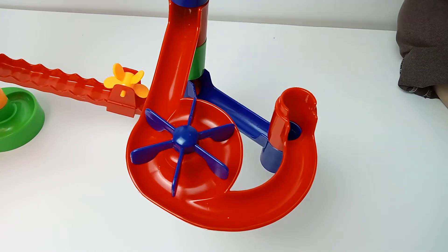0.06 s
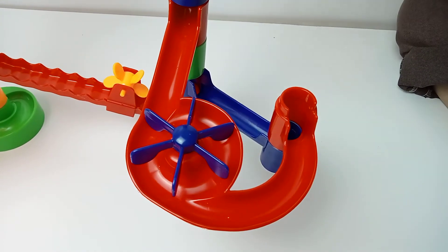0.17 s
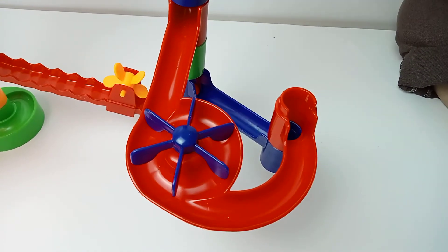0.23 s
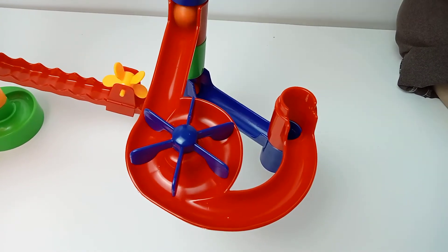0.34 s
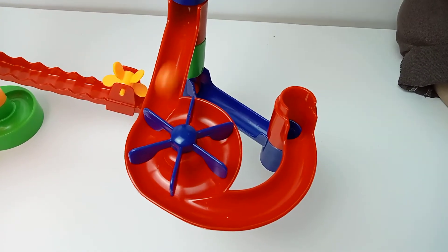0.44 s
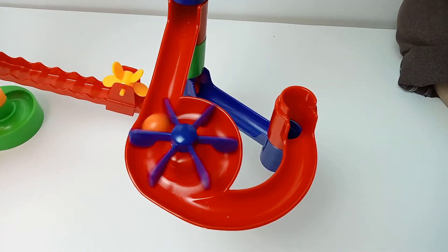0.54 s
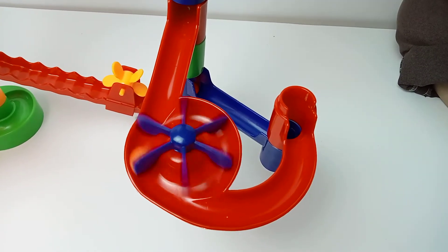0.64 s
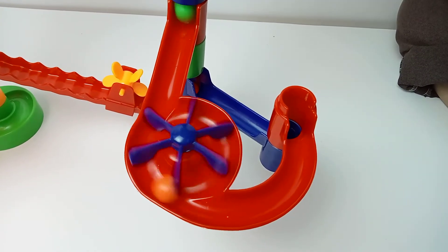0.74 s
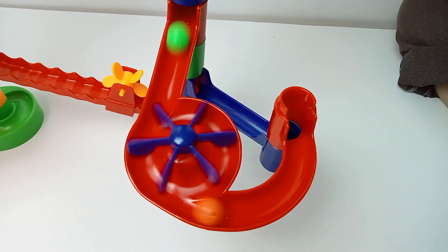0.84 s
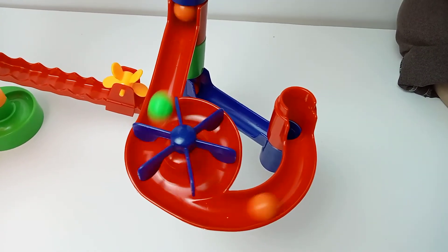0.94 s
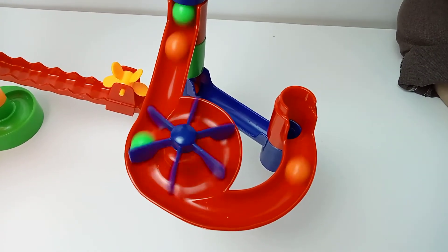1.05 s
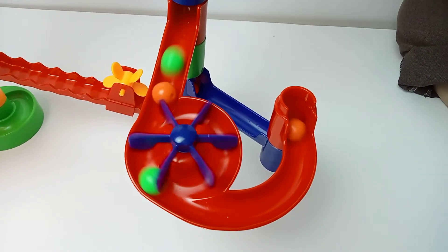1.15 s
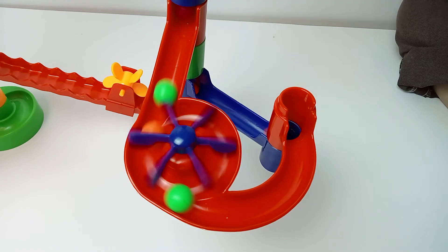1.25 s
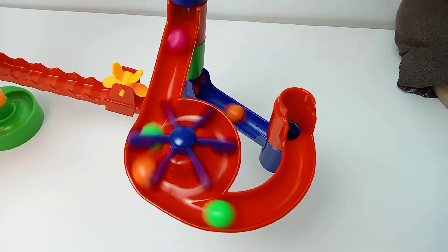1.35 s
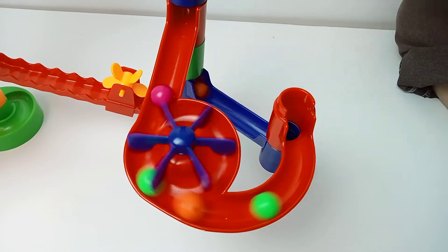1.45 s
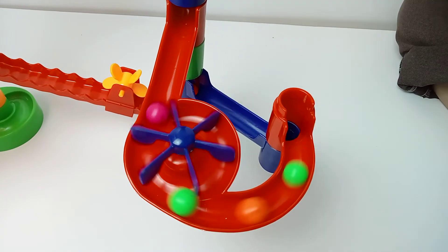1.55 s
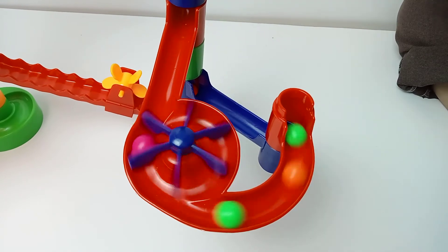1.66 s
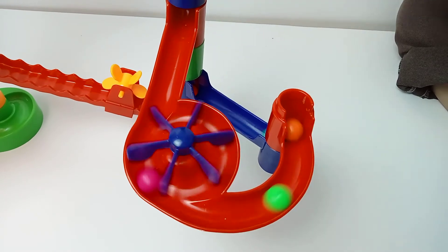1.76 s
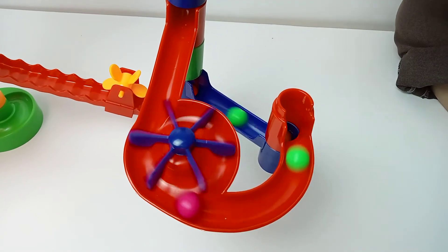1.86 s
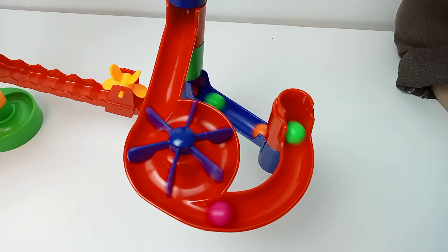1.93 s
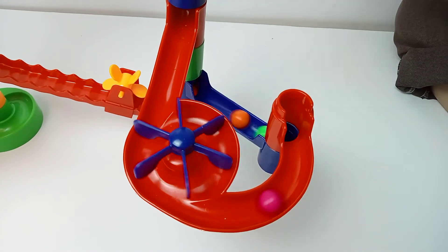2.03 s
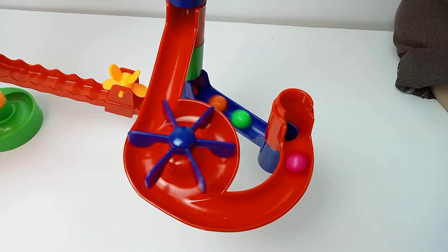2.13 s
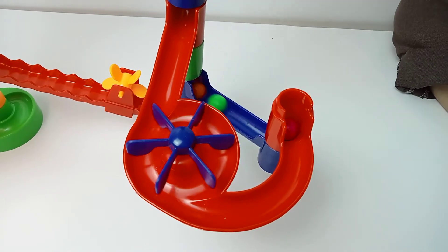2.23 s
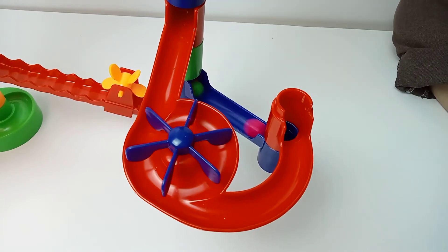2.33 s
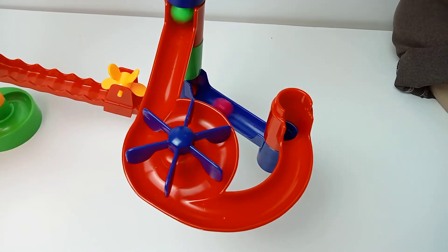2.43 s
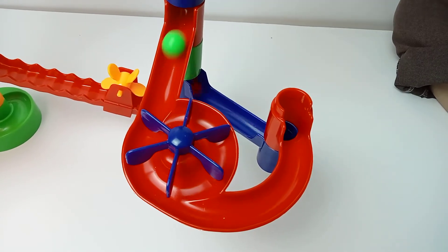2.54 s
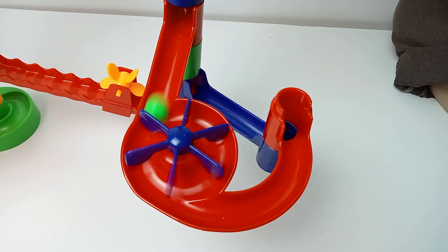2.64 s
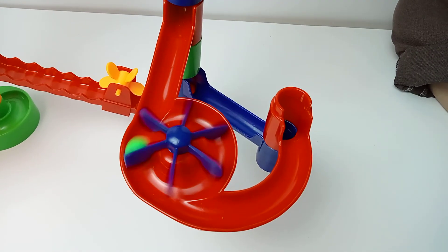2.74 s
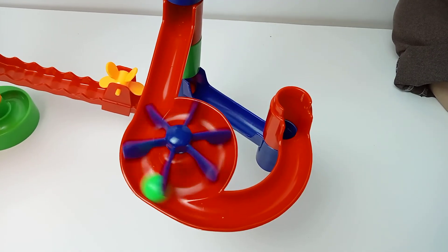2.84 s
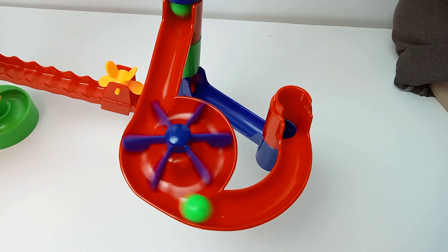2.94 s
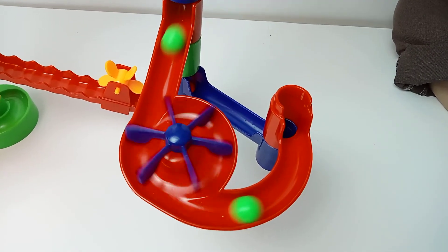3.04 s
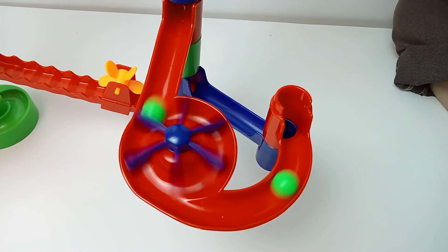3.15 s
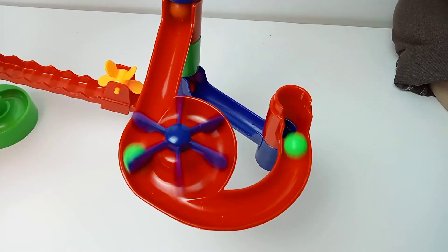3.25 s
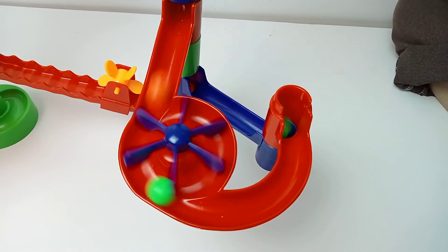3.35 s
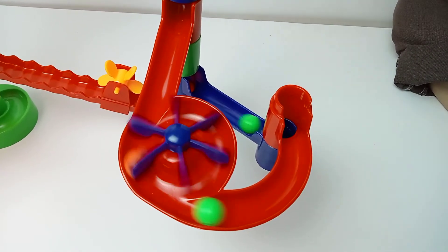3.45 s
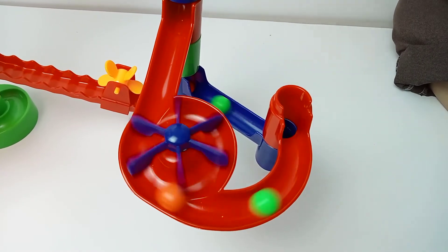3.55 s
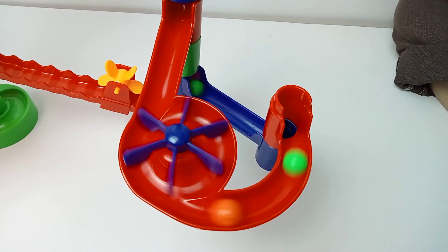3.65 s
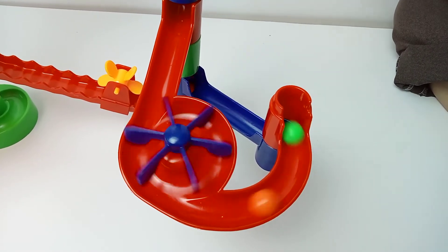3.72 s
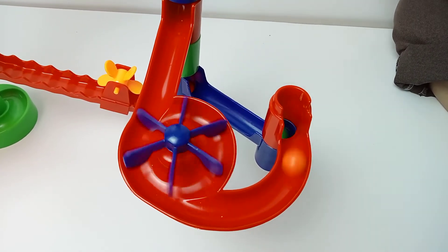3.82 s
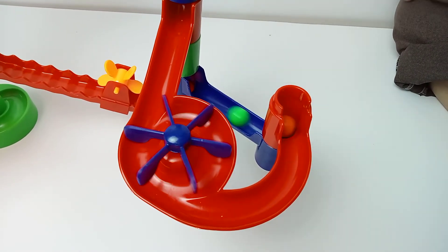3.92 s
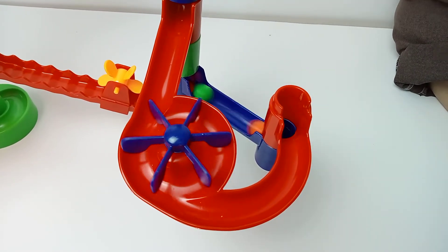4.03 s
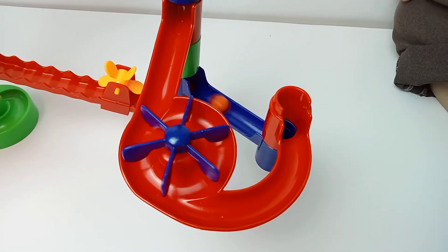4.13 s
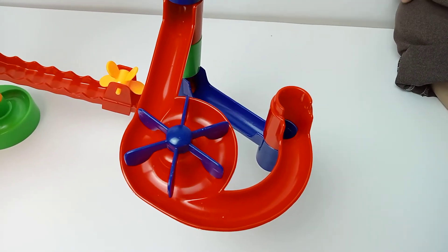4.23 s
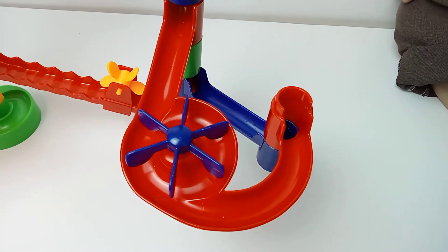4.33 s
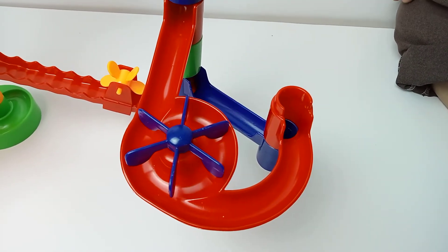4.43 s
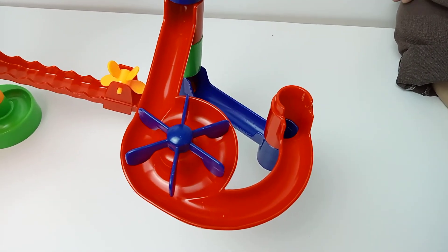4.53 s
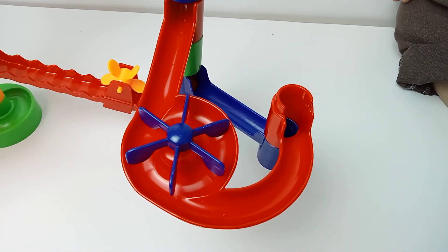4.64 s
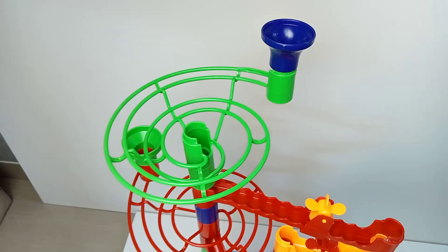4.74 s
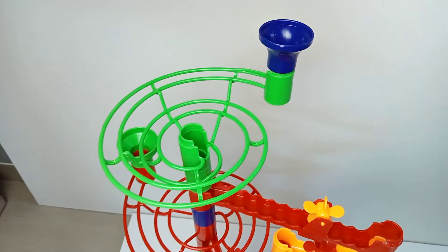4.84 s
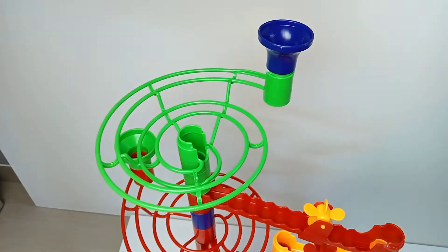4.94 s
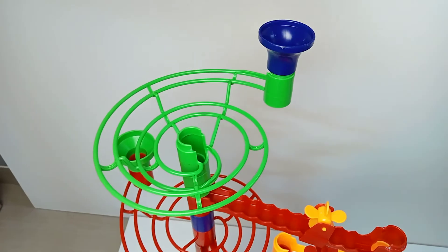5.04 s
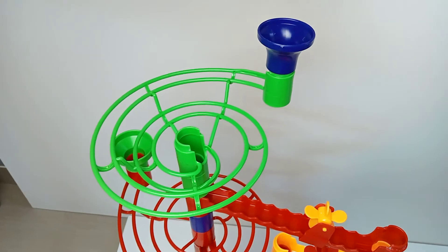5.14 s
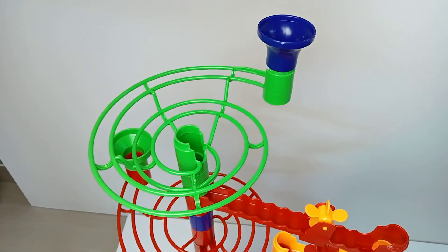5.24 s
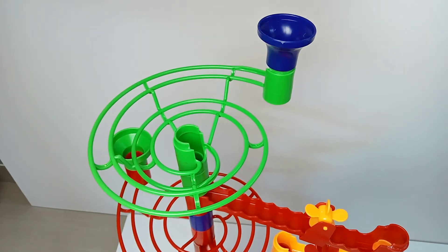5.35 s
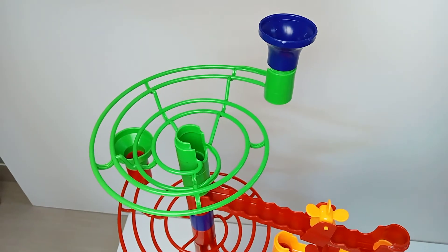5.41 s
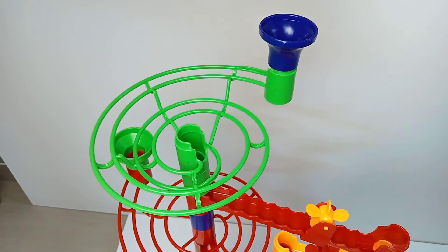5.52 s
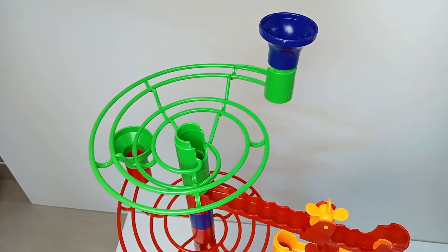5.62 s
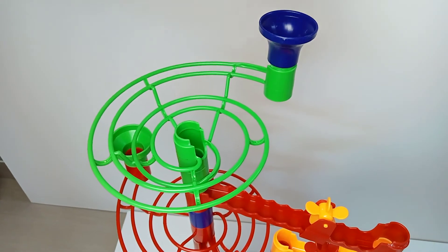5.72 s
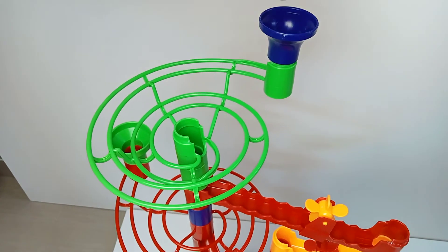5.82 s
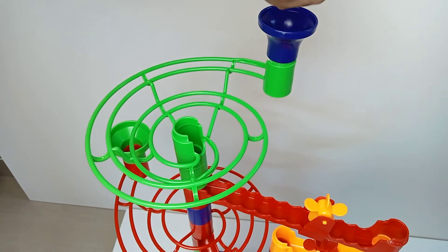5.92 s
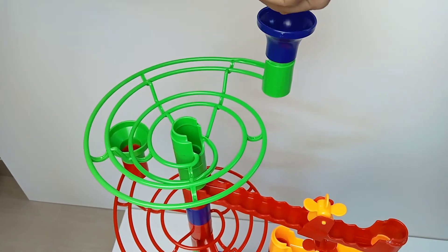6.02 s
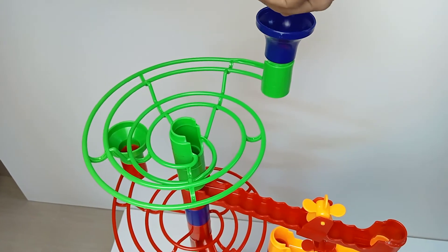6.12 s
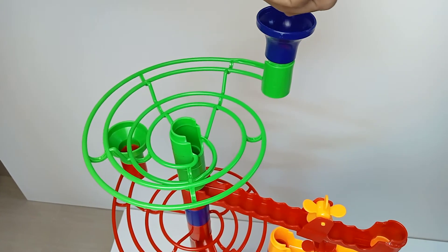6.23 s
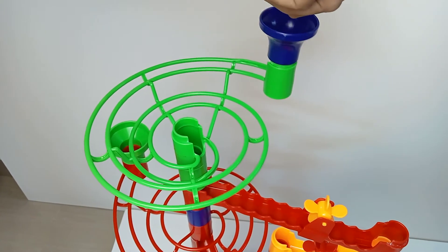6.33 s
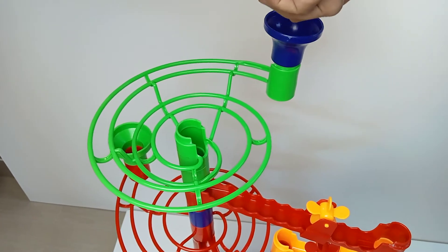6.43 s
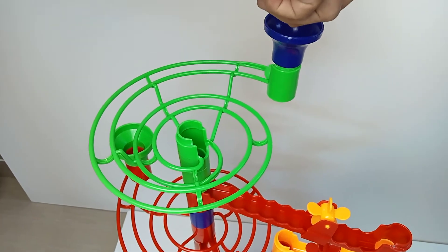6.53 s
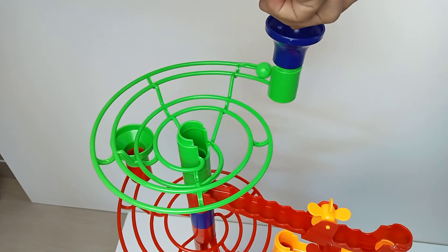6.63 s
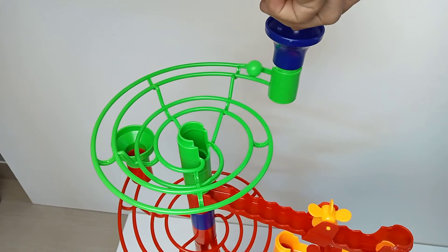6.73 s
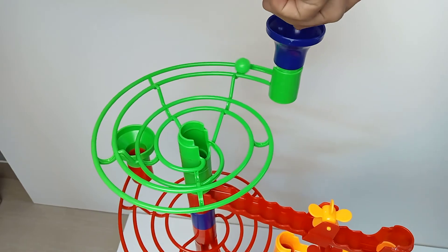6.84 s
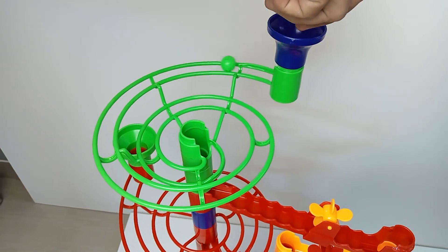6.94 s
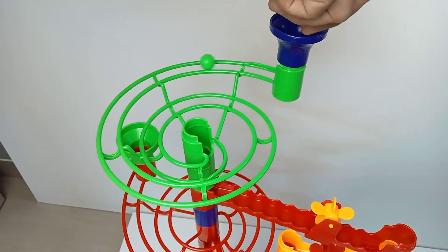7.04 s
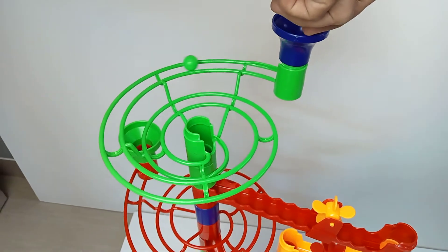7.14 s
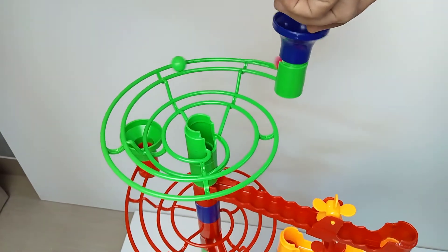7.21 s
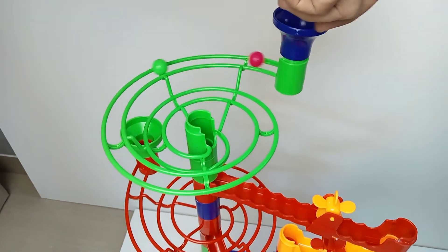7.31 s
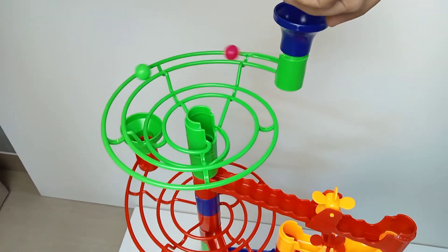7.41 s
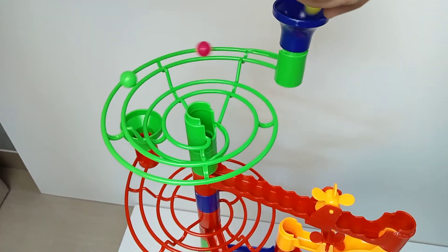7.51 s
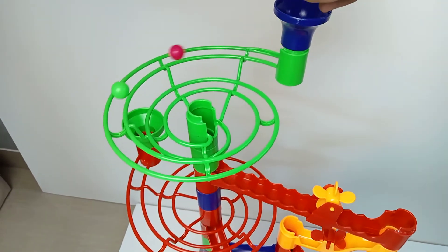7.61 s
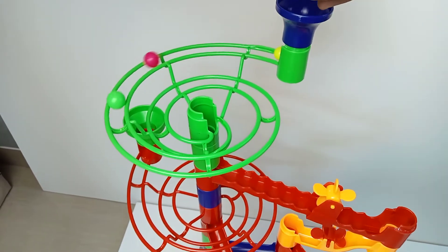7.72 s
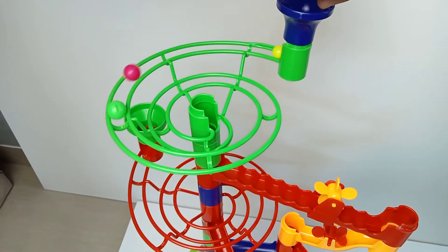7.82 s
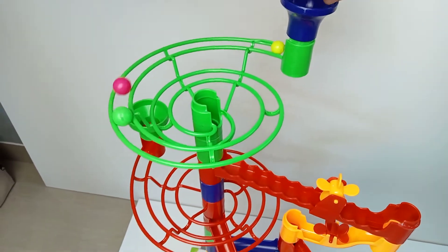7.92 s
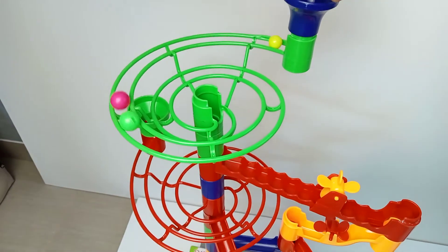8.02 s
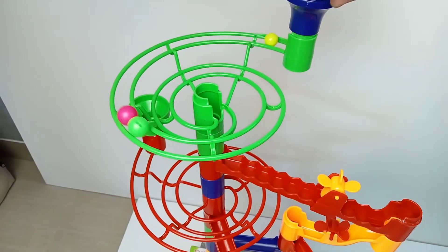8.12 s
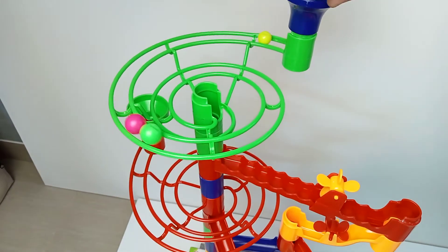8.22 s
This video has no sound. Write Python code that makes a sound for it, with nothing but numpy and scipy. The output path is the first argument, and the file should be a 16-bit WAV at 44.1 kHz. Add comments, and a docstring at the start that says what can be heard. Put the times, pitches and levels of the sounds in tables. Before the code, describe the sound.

Close microphone in a small hard-walled room. Irregular, bright clacks of marbles on hollow plastic come many per second, with fine rolling rattle between and a short echo. The clatter grows sparse and stops at a brief fade. After over a second of faint hiss and low far engine hum, four separate drops clack in short bursts, with soft rolling between them.

```python
"""Marbles on a plastic track

Glass marbles knock through a paddle wheel in a hard-walled room; after a short fade and a quiet wait, single ones
drop into a funnel and roll along rails. Knocks and rolling are envelopes of noise that sound a crack, the plastic's
modes and the pitch of the piece struck. A far engine hums in sine lines over faint noise hiss, with one thin whistle;
the room is decaying noise.
"""
import sys
import numpy as np
from scipy import signal
from scipy.fft import rfft, irfft
from scipy.io import wavfile
from scipy.ndimage import uniform_filter1d, minimum_filter1d

SR = 44100
rng = np.random.default_rng(int(sys.argv[2]) if len(sys.argv) > 2 else 0)


def inscribe(sig):
    """Save sig as 16-bit PCM at rate SR to the path in sys.argv[1].

    A 1-D sig is mono; a 2-D sig holds one channel per row.
    Samples are clipped to [-1, 1] before scaling.
    """
    pcm = np.round(np.clip(np.atleast_2d(sig).T, -1, 1) * 32767)
    wavfile.write(sys.argv[1], SR, pcm.astype(np.int16))


N = 364694
CUT_S = 4.7   # wheel section before, funnel section after
BODY_HZ, TREBLE_HZ, AIR_HZ = 2300, 5500, 9000   # edges between body, middle, treble and air

# marble against plastic: t/s, relative level/dB, pitch of the hollow piece struck f/Hz, hardness as treble level/dB
KNOCKS = [(0.0385, -15, 4050, 3), (0.103, -16, 3050, -3), (0.1452, -22.5, 2980, 5.5),
          (0.178, -33.5, 3200, 3), (0.192, -4, 3310, -12.5), (0.222, -15.5, 2460, -31),
          (0.2587, 2, 3190, -2), (0.2773, -19.5, 3150, -4.5), (0.289, -12, 4060, 0),
          (0.313, -16.5, 3180, -4), (0.348, -19, 3000, -3), (0.3711, -0.5, 4150, -5),
          (0.385, -23.5, 4070, -3), (0.403, -7, 3280, -12), (0.43, -8.5, 3220, 3.5),
          (0.4413, -1, 3450, -31.5), (0.459, -19, 3620, -9), (0.488, -14, 4060, -11),
          (0.5047, -23, 4180, -5.5), (0.516, -14, 4100, -8.5), (0.539, -14.5, 2550, -2.5),
          (0.568, -11.5, 4100, -19), (0.593, -18.5, 4150, -7.5), (0.6252, -19, 3910, 5),
          (0.675, -10.5, 3096, -13.5), (0.721, -32.5, 3070, -13), (0.747, -0.5, 4204, -3),
          (0.815, -4, 3563, -6), (0.8513, -9, 3480, -2), (0.874, -21, 3550, -13), (0.8995, -11, 4120, -6.5),
          (0.921, -9, 4250, -3), (0.965, -6.5, 3420, -12), (0.988, -13.5, 3340, -23), (1, -10, 3440, -8.5),
          (1.0193, 2.5, 3400, -8), (1.04, -11.5, 3420, -8.5), (1.09, -20, 3330, 0), (1.098, 2, 3460, -9),
          (1.115, -12, 3420, -16.5), (1.135, -10.5, 3370, -1), (1.153, -9, 3310, -15),
          (1.172, -14.5, 3470, -10.5), (1.238, -11.5, 3460, -1), (1.243, -6, 3310, 1),
          (1.276, -9.5, 3320, -14), (1.2996, -11, 4200, -1), (1.3262, -8.5, 3470, -9),
          (1.3578, -14, 3300, 9), (1.3678, 1, 3390, -27.5), (1.3864, -12.5, 3400, -18.5),
          (1.455, -26, 3320, 6.5), (1.4777, -23, 2820, 7), (1.4962, -11, 3340, -1), (1.527, -18, 3600, -2),
          (1.5456, -17.5, 2660, 10), (1.5912, -18.5, 3230, -10), (1.6083, -8.5, 3320, -0.5),
          (1.6865, -4, 3186, -6.5), (1.702, -17, 3170, -2), (1.72, -12, 3360, 2), (1.771, -21.5, 3300, 4),
          (1.809, -23, 3210, -0.5), (1.826, -12, 3230, -14), (1.8594, -18.5, 2870, 6),
          (1.893, -4.5, 3490, -4.5), (1.9115, -11, 3280, -9.5), (1.967, -17, 3500, -1.5),
          (1.98, -5.5, 3320, -8), (2.005, -12.5, 3500, -8), (2.027, -18.5, 3200, -7),
          (2.089, -25, 3600, -7), (2.105, -8.5, 3500, -4), (2.113, -9, 3270, -4.5), (2.1444, -5, 3210, -5),
          (2.211, -20.5, 3000, -10), (2.221, -12, 3110, 3), (2.2352, -6.5, 3150, -0.5),
          (2.2998, -13.5, 3035, -6.5), (2.35, -19, 3270, -2), (2.373, -9, 3330, -15.5),
          (2.3915, -14, 3700, 2.5), (2.418, -9.5, 4080, -27), (2.428, -6, 4100, -3),
          (2.443, -13.5, 4060, -2), (2.5253, -4, 3310, -4.5), (2.5444, 2.5, 3340, -14),
          (2.561, -11.5, 3330, -4.5), (2.6, -28.5, 3220, 6), (2.6263, -8.5, 3270, -11.5),
          (2.6696, -15, 3480, -6.5), (2.686, -8.5, 3100, -7), (2.7254, -10.5, 3940, -0.5),
          (2.752, -21.5, 3180, -6.5), (2.7931, -11, 4180, -4), (2.831, -9.5, 3420, 2),
          (2.8462, -10.5, 4020, -22), (2.901, -15.5, 4130, -7.5), (2.9536, -11.5, 3280, -16),
          (2.9972, -11.5, 3300, 0), (3.0044, -4, 3320, -19), (3.06, -14, 3280, -7.5),
          (3.1055, -13.5, 3300, -13.5), (3.139, -25.5, 3300, -0.5), (3.149, -10, 4080, -14),
          (3.1629, -4.5, 4100, 0), (3.1786, -11, 4100, -4.5), (3.195, -30, 2460, 0.5),
          (3.25, -23, 3150, -1.5), (3.278, -22.5, 2700, -9), (3.3174, -8.5, 3540, -11),
          (3.3234, -3, 3330, -21), (3.346, -20.5, 3450, 6), (3.429, -9.5, 3270, 0.5),
          (3.465, -14.5, 3470, -13), (3.4854, -19, 3430, 6), (3.529, -13.5, 2620, 1),
          (3.572, -24.5, 3490, -15), (3.6435, -23.5, 2640, -11), (3.82, -16, 2950, -4),
          (3.852, -1, 3184, -1), (3.8821, -10.5, 3214, -21), (3.9434, -12, 3560, 0.5),
          (4.0483, -17, 2600, 0.5), (4.063, -5.5, 3440, -9), (4.1, -16.5, 3470, 6),
          (4.148, -13.5, 2655, -17.5), (4.203, -4, 3110, -5), (4.226, -4.5, 2860, -3),
          (4.25, -13.5, 3310, -21), (4.339, -10, 2480, -24), (4.3446, -4.5, 3165, -9.5),
          (4.386, -10, 2864, -4.5), (6.2946, -1.5, 3186, -23), (6.323, 1, 3225, -26),
          (6.355, 0, 3200, -14.5), (6.39, -28, 3110, -4), (6.432, -13.5, 3330, -20),
          (6.47, -15.5, 3180, -28), (6.505, -19, 3360, -27), (6.612, -27, 2945, -31),
          (6.702, -33.5, 3210, -12.5), (7.143, -5.5, 3094, -9.5), (7.202, -12, 3180, -13),
          (7.22, -2, 3174, -18.5), (7.2387, -8.5, 3256, -13.5), (7.303, -28, 3150, 2),
          (7.325, -28.5, 2940, 7), (7.586, -23, 2230, -9), (7.6015, -21, 2280, -6),
          (7.635, -3.5, 3160, -35), (7.671, -4, 3230, -12), (7.7525, -11.5, 3320, -16),
          (7.766, -15, 2880, -13), (7.8384, -17, 3190, -21), (7.886, -24.5, 2910, -21),
          (8.163, -30.5, 2120, -16), (8.1786, -20, 2160, 0.5), (8.2095, -17, 3050, -8.5),
          (8.2523, -5, 3290, -18)]


def from_db(db):
    """Amplitude ratio of a level in dB."""
    return 10 ** (np.asarray(db) / 20)


def rms_one(x):
    """Scale to rms 1."""
    return x / np.sqrt(np.mean(x ** 2) + 1e-20)


def in_time(rows):
    """Curve of (s, value) at every sample."""
    s, values = np.transpose(rows)
    return np.interp(np.arange(N) / SR, s, values)


def at_hz(points, hz):
    """Curve of (Hz, value), interpolated over log frequency."""
    point_hz, values = np.transpose(points)
    return np.interp(np.log(hz), np.log(point_hz), values)


def coloured(spectrum, low_hz=20, high_hz=20000):
    """Steady noise with the given spectrum between two edges; rms 1."""
    hz = np.arange(1, N // 2 + 2) * SR / N
    edges = 1 / np.sqrt((1 + (low_hz / hz) ** 12) * (1 + (hz / high_hz) ** 12))
    white = rfft(rng.standard_normal(N))
    return rms_one(irfft(white * from_db(at_hz(spectrum, hz)) * edges, N))


def resonance(x, hz, width_hz):
    """Two-pole mode, gain about 1 at its peak."""
    r = np.exp(-np.pi * width_hz / SR)
    zeros = np.array([1, 0, -1]) * (1 - r * r) / 2
    poles = [1, -2 * r * np.cos(2 * np.pi * hz / SR), r * r]
    return signal.lfilter(zeros, poles, x)


def swell(clicks, rise_s, t60_s):
    """Envelope that rises after each click and dies away."""
    fall = from_db(-60 / (t60_s * SR))
    rise = np.exp(-1 / (rise_s * SR))
    return signal.lfilter([1 - rise], np.convolve([1, -fall], [1, -rise]), clicks + 1e-18)


def drift(rate_hz):
    """Smooth chance wander, rms 1."""
    r = np.exp(-2 * np.pi * rate_hz / SR)
    wander = signal.lfilter([1], [1, -2 * r, r * r], rng.standard_normal(N + SR))
    return rms_one(wander[SR:])   # drop the filter's start-up


def clicks_at(s, db):
    """Single-sample clicks at the given times and levels."""
    out = np.zeros(N)
    at = np.clip(np.round(np.asarray(s) * SR).astype(int), 0, N - 1)
    np.add.at(out, at, from_db(db))
    return out


def rolling():
    """Envelopes of marbles tapping over seams and ribs and jolting over rail joints; none roll in the wait."""
    # rattle of the marble stream through the wheel: t/s, relative level/dB
    stream = [(0, -24.5), (0.9, -26.5), (1.4, -28), (1.7, -21.5), (2.07, -29.5), (2.5, -25), (2.7, -25.5),
              (3.28, -34), (3.5, -19), (3.62, -27.5), (3.8, -34.5), (3.9, -21.5), (4.15, -29),
              (4.32, -28.5), (4.45, -39), (4.66, -41)]
    early = np.arange(N) < CUT_S * SR
    level_db = np.where(early, in_time(stream), funnel_rattle())
    # treble and air swing more than the level, the body less
    body_db = np.where(early, -10 + 0.98 * level_db, -24 + 0.76 * level_db)
    treble_db = -9 + 1.56 * level_db
    air_db = 4 + 2.7 * level_db
    tap_rate_hz = 220
    tap_db = 3.0 * np.minimum(rng.exponential(1, N), 2)
    taps = (rng.random(N) < tap_rate_hz / SR) * from_db(tap_db)
    seams = swell(taps, 0.00015, 0.03)
    shake = np.where(early, rms_one(seams + 1.2), rms_one(seams + 2.5))
    sharp = rms_one(seams ** 1.3 + .05)   # favours the harder taps
    return (from_db(body_db) * shake, from_db(level_db - 15.5) * shake,
            from_db(treble_db) * shake, from_db(air_db) * sharp)


def engine():
    """A far engine hums in a few sine lines; the strongest swells and fades, the others follow it less and waver."""
    # pitch of the strongest line: t/s, f/Hz
    hum_hz = [(0, 93.5), (2.3, 87.7), (3.5, 93.8), (4.69, 100.9), (4.71, 104.7), (7.6, 90.45), (8.27, 91.7)]
    # its swell: t/s, relative level/dB
    hum_swell = [(0, -60), (0.3, -71.5), (1.9, -62.5), (2.5, -63), (2.7, -63), (3.3, -61), (4.65, -54),
                 (4.85, -68), (5.08, -51), (5.4, -66), (5.85, -60), (6.6, -76), (6.95, -56), (7.4, -58),
                 (7.8, -89)]
    # before and after CUT_S, the strongest line, then the weaker ones: multiple of the firing cycle, relative level/dB
    early_lines = [(5, 0), (4, -13), (6, -11), (16, -9), (17, -13)]
    late_lines = [(3, 0), (4, -8), (6, -19)]
    approach_db_per_s = 0.25   # per multiple: of the weaker lines, higher ones grow most as the engine nears
    turns = np.cumsum(in_time(hum_hz) + 0.8 * drift(1.5)) / SR
    early = np.arange(N) < CUT_S * SR
    strongest_db = in_time(hum_swell) + 3 + 2.2 * drift(4.0)
    far_db = approach_db_per_s * np.maximum(CUT_S - np.arange(N) / SR, 0)
    out = 0
    for lines, part in ((early_lines, early), (late_lines, ~early)):
        for k, (multiple, db) in enumerate(lines):
            weaker_db = 0.39 * strongest_db - 33.5 + db + 3.0 * drift(0.91) - multiple * far_db
            level_db = strongest_db if k == 0 else weaker_db
            out = out + part * from_db(level_db) * np.sin(2 * np.pi * turns * multiple / lines[0][0])
    return out


def room_hiss():
    """Coloured noise, gathered in a few narrow bands."""
    # colour: f/Hz, relative density level/dB
    hiss_colour = [(30, -33.5), (60, -5), (150, -7), (264, -12), (406, -11.5), (805, -13.5), (1210, -17.5),
                   (1980, -17.5), (2450, -15), (3600, -23), (4860, -43.5), (6000, -45.5), (7270, -32.5),
                   (8300, -42.5), (16000, -57)]
    # t/s, level/dB before the narrow bands and recording gain
    hiss_level = [(0, -63.5), (3.5, -59), (5.1, -57.5), (6.2, -64), (8.27, -61)]
    # narrow bands: f/Hz, level/dB of the added band
    hiss_peaks = [(800, 2), (1210, 4), (2470, 2.6)]
    hiss = coloured(hiss_colour)
    peaks = sum(from_db(db) * resonance(hiss, hz, width_hz=28) for hz, db in hiss_peaks)
    return from_db(in_time(hiss_level)) * (hiss + peaks)


def knocks():
    """Crack envelopes follow strength and hardness, highs die first, lows start later; rings follow strength only."""
    s, db, hz, treble_db = np.transpose(KNOCKS)
    body = swell(clicks_at(s, db + 1.2 * treble_db - 11.5), 0.0061, 0.062)
    middle = swell(clicks_at(s, db + 0.44 * treble_db - 6.5), 0.0012, 0.034)
    treble = swell(clicks_at(s, db + treble_db - 9.0), 0.0027, 0.034)
    air = swell(clicks_at(s, db + 0.68 * treble_db - 9.0), 0.0028, 0.021)
    # high wheel pieces ring on a second, higher partial too
    paddle_hz, partner_ratio, partner_db = 3850, 1.165, -11
    high = (hz > paddle_hz) & (s < CUT_S)
    partners = hollows(s[high], db[high] + partner_db, partner_ratio * hz[high], width_hz=180)
    rings = hollows(s, db - 7.0, hz, width_hz=78) + partners
    chatter = rms_one(from_db(4 * drift(680)))   # a knock is a cluster of tiny touches
    return body, chatter * middle, chatter * treble, chatter * air, rings


def hollows(s, db, hz, width_hz):
    """The piece struck rings on its own pitch, driven by the few ms of chatter of the contact."""
    out = np.zeros(N + SR)
    t = np.arange(round(.08 * SR)) / SR
    shape = np.exp(-t / 0.003) * (1 - np.exp(-t / 0.0015))
    chatter = rng.standard_normal((len(s), len(t))) * shape
    for k, at in enumerate(np.round(s * SR).astype(int)):
        ring = resonance(resonance(chatter[k], hz[k], width_hz), hz[k], 430)
        out[at:at + len(t)] += from_db(db[k]) * ring / np.abs(ring).max()
    return out[:N]


def patchy(x, low_hz, high_hz, count, patchy_db):
    """Contact colour keeps changing: each slice of the range flickers on its own; rms 1."""
    edges = np.geomspace(low_hz, high_hz, count + 1)
    out = 0
    for pair in zip(edges, edges[1:]):
        band = signal.sosfilt(signal.butter(2, pair, "band", fs=SR, output="sos"), x)
        out = out + from_db(patchy_db * drift(20)) * band
    return rms_one(out)


def contact(body, middle, treble, air):
    """Envelopes of four ranges play the noise crack of contact and drive the track's modes."""
    # colour of a contact: f/Hz, relative density level/dB
    crack_colour = [(240, -72), (400, -45.5), (719, -33.5), (949, -20), (1220, -22), (2050, -17.5),
                    (2970, 4), (3370, 10.5), (3810, 3.5), (4180, 3), (5270, -33), (7280, -8.5),
                    (8760, -31.5), (15000, -42), (16000, -26)]
    # the body thins as fewer marbles load the track
    thins_s, thins_db_per_s = 2.0, 2
    t = np.arange(N) / SR
    body = body * from_db(-thins_db_per_s * np.maximum(t - thins_s, 0) * (t < CUT_S))
    low = coloured(crack_colour, 440, BODY_HZ)
    mid = coloured(crack_colour, BODY_HZ, TREBLE_HZ)
    high = coloured(crack_colour, TREBLE_HZ, AIR_HZ)
    top = coloured(crack_colour, AIR_HZ)
    crack = (body * patchy(low, 291.5, BODY_HZ, count=4, patchy_db=1.5)
             + middle * patchy(mid, BODY_HZ, TREBLE_HZ, count=4, patchy_db=1.8)
             + treble * patchy(high, TREBLE_HZ, AIR_HZ, count=3, patchy_db=2.5)
             + air * patchy(top, AIR_HZ, 15900, count=4, patchy_db=4.0))
    shake = rng.standard_normal(N)
    return crack + track(from_db(20.0) * body * shake, from_db(13.5) * middle * shake,
                         from_db(18.5) * treble * shake, from_db(5.0) * air * shake)


def track(body, middle, treble, air):
    """The plastic rings in the modes of the wheel section, later in those of the funnel section."""
    # modes of wheel and chutes: f/Hz, width/Hz (at least 28 Hz is used), relative level/dB
    wheel_modes = [(1020, 500, -27.5), (2675, 61, -3), (3596, 37, -1), (4100, 270, -9), (4720, 48, -11),
                   (6500, 96, -8.5), (6680, 150, -8), (7660, 180, -13.5), (10130, 85, -12.5),
                   (10600, 110, -16), (12700, 170, -13), (14700, 130, -13.5)]
    # modes of funnel and rails: f/Hz, width/Hz (at least 28 Hz is used), relative level/dB
    funnel_modes = [(286, 24, -18.5), (336, 26, -16), (705, 47, -12), (810, 25, -7.5), (1197, 94, -10.5),
                    (1951, 16, 0), (2803, 24, -3), (3764, 40, -1), (4050, 19, -22), (4540, 23, -2),
                    (7270, 530, -10.5), (8750, 330, -11.5), (14800, 900, -5)]
    # the last marbles move on down the chutes and the wheel's modes fade
    leave_s, fade_db_per_s = 3.1, 0.5
    early = np.arange(N) < CUT_S * SR
    near = from_db(-fade_db_per_s * np.maximum(np.arange(N) / SR - leave_s, 0))
    out = np.zeros(N)
    for modes, part in ((wheel_modes, early * near), (funnel_modes, ~early)):
        for hz, width_hz, db in modes:
            spread_db = 5.0 if hz > BODY_HZ else 2.5
            strike = from_db(db + spread_db * drift(20))   # the marble touches at ever other spots
            drive = body if hz < BODY_HZ else middle if hz < TREBLE_HZ else treble if hz < AIR_HZ else air
            out += resonance(drive * part * strike, hz, max(width_hz, 28))
    return out


def singing(roll):
    """Rolling keeps the piece that was struck last sounding until the next knock."""
    out = np.zeros(N)
    rub = roll * rng.standard_normal(N)
    starts = [round(row[0] * SR) for row in KNOCKS] + [N]
    for row, a, b in zip(KNOCKS, starts, starts[1:]):
        drive = np.pad(rub[a:b], (0, 1000))[:N - a]   # room to ring out
        out[a:a + len(drive)] += resonance(drive, row[2], 51)
    return from_db(22.5) * out


def bumps():
    """A low push through the table top: a click through two equal resonances."""
    # t/s, peak level/dB before recording gain, f/Hz, width of each resonance/Hz
    heavy_bumps = [(0.43, -20, 103.5, 173), (3.891, -35.5, 239, 71)]
    out = np.zeros(N)
    for s, db, hz, width_hz in heavy_bumps:
        ring = resonance(resonance(clicks_at([s], [0]) + 1e-18, hz, width_hz), hz, width_hz)
        out -= from_db(db) * ring / np.abs(ring).max()
    return out


def pings():
    """Thin high pings, as of glass on glass, each a narrow resonance."""
    # t/s, peak level/dB before recording gain, f/Hz
    ping_rows = [(0.591, -29, 12780), (0.919, -28, 10130), (2.751, -31.5, 12400), (2.796, -28, 15100),
                 (3.25, -26, 12820), (3.323, -23, 6400), (4.343, -27.5, 10660), (7.145, -16, 7200),
                 (8.253, -22.5, 8750)]
    return hollows(*np.transpose(ping_rows), width_hz=120)


def whistle():
    """A faint thin sine of wavering pitch that rises fast and falls more slowly."""
    peak_s, peak_db, rise_db_per_s, fall_db_per_s = 6.1, -71, 399.5, 118
    after = np.arange(N) / SR - peak_s
    level_db = peak_db + np.minimum(rise_db_per_s * after, -fall_db_per_s * after)
    pitch_hz = 7100 + 30 * drift(58.4)
    return from_db(level_db) * rms_one(np.sin(2 * np.pi * np.cumsum(pitch_hz) / SR))


def funnel_rattle():
    """Level in dB: each drop starts a rattle that holds and fades, each rail joint a short rumble."""
    # a marble drops into the funnel and rattles down its neck: t/s, relative level/dB
    drops = [(6.302, -28.5), (7.194, -26), (7.642, -26.5), (8.19, -26.5)]
    # a marble on the rails jolts over a joint: t/s, relative level/dB
    joints = [(6.9, -41), (6.968, -42), (7.056, -37), (7.945, -46), (7.993, -37), (8.047, -38.5),
              (8.101, -36)]
    hold_s, drop_fade_db_per_s, joint_fade_db_per_s = 0.16, 68.5, 150
    t = np.arange(N) / SR
    power = 1e-12
    for s, db in drops:
        rattle_db = db - drop_fade_db_per_s * np.maximum(t - s - hold_s, 0)
        power = power + (t > s) * from_db(2 * rattle_db)
    for s, db in joints:
        rumble_db = db - joint_fade_db_per_s * np.maximum(t - s, 0)
        power = power + (t > s) * from_db(2 * rumble_db)
    return 10 * np.log10(power)


def room(x):
    """Reflections as noise that dies band by band."""
    # f/Hz, t60/s
    room_t60 = [(800, 0.19), (3500, 0.38), (9000, 0.11), (15000, 0.14)]
    t = np.arange(SR) / SR
    edges = 300 * 2 ** np.arange(0, 6.1, .5)
    tail = 0
    for low, high in zip(edges, edges[1:]):
        band_filter = signal.butter(2, [low, high], "band", fs=SR, output="sos")
        band = signal.sosfilt(band_filter, rng.standard_normal(SR))
        tail = tail + band * from_db(-60 * t / at_hz(room_t60, np.sqrt(low * high)))
    tail = tail * np.clip((t - .003) / 0.0017, 0, 1)   # first reflections after 3 ms
    tail = tail / np.sqrt(np.sum(tail ** 2))
    cut = round(CUT_S * SR)   # the wheel's echo ends with the fade
    return np.concatenate([signal.fftconvolve(p, tail)[:len(p)] for p in (x[:cut], x[cut:])])


def limiter(x):
    """Gain that eases the nearby peaks under the limit."""
    limit, size = .88, round(.002 * SR)
    peak = -minimum_filter1d(-np.abs(x), size=2 * size) / limit + 1e-9
    return x * uniform_filter1d((1 + peak ** 4) ** -.25, size=size)


def scene():
    """Knocks and rolling share one track; the rings point at the microphone and reach the walls more weakly."""
    *hits, rings = knocks()
    rolls = rolling()
    clatter = contact(*(np.hypot(hit, roll) for hit, roll in zip(hits, rolls)))
    rings = rings + singing(rolls[1]) + pings()
    echo = room(from_db(-12.0) * clatter + from_db(-14.5) * rings)
    background = engine() + room_hiss() + whistle()
    return (clatter + rings + echo + bumps() + background)[None]


def record(dry):
    """A quick fade out and a slower fade in, a limiter, a step down near the top and a steep cut."""
    fade_out_s, fade_out_length_s, fade_in_s, fade_in_time_s = 4.672, 0.021, 4.708, 0.081
    wheel_gain_db, funnel_gain_db = 7.5, 9.5
    t = np.arange(N) / SR
    fade_out = np.clip(1 - (t - fade_out_s) / fade_out_length_s, 0, 1) ** 2
    fade_in = 1 - np.exp(-np.maximum(t - fade_in_s, 0) / fade_in_time_s)
    x = limiter(dry * (from_db(wheel_gain_db) * fade_out + from_db(funnel_gain_db) * fade_in))
    x = signal.sosfilt(signal.ellip(8, .5, 24, 15520, fs=SR, output="sos"), x)
    return signal.sosfilt(signal.ellip(12, .5, 90, 16550, fs=SR, output="sos"), x)


dry = scene()
out = record(dry)
inscribe(out)
```